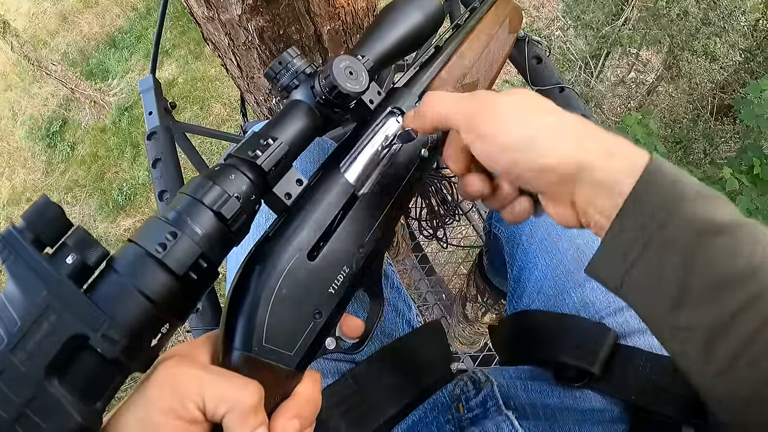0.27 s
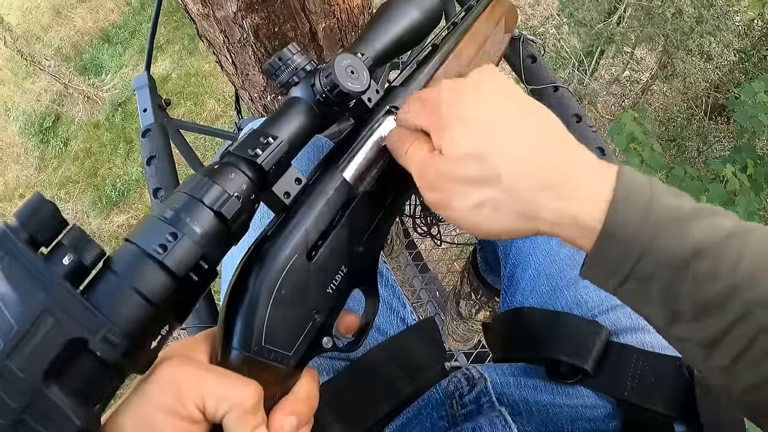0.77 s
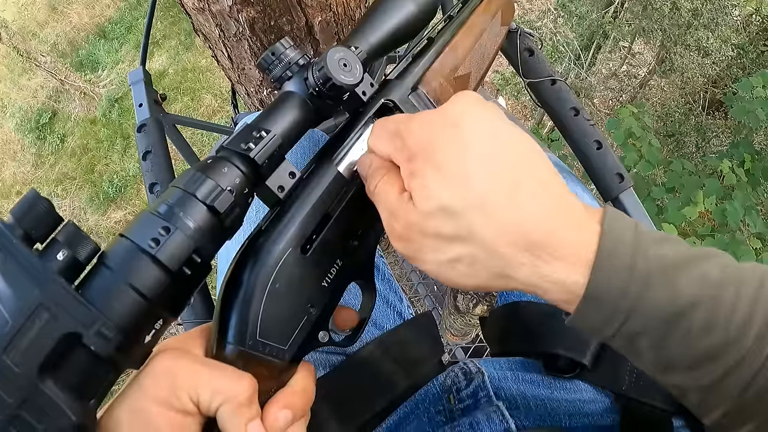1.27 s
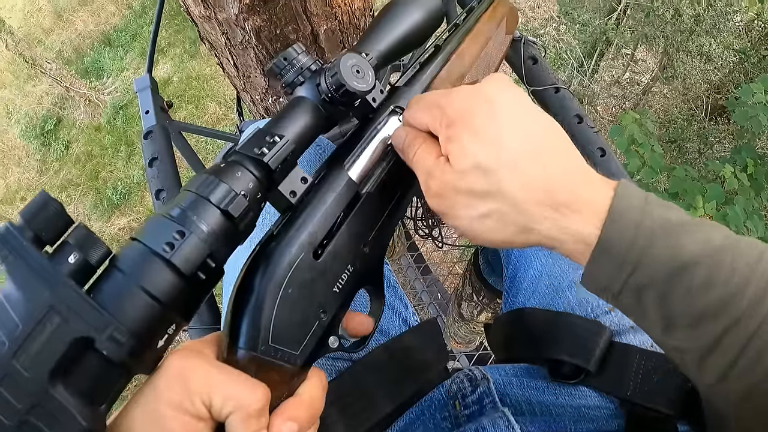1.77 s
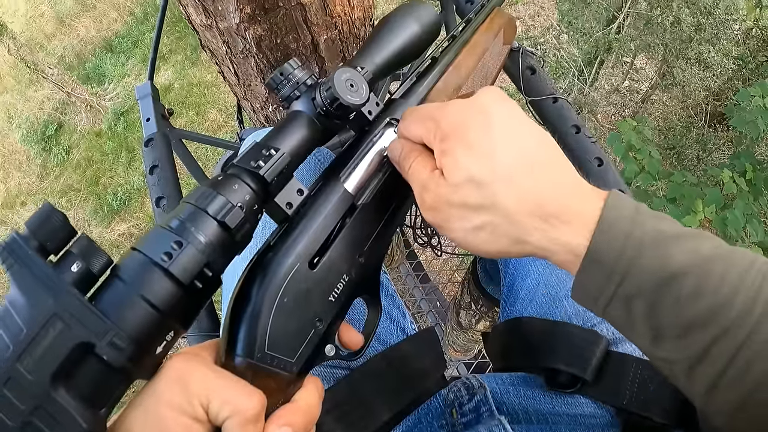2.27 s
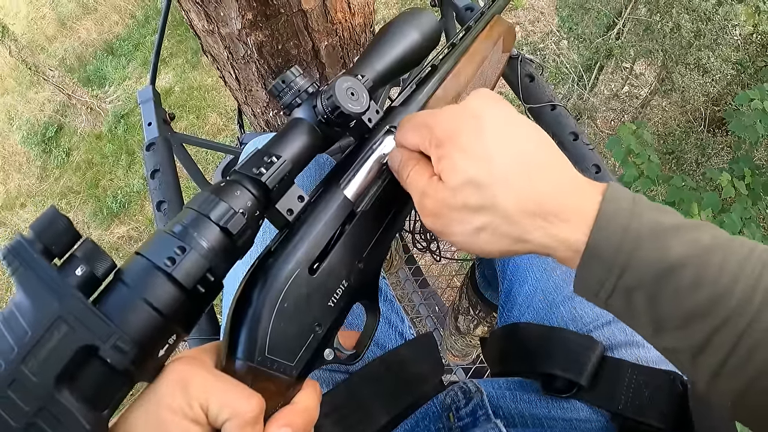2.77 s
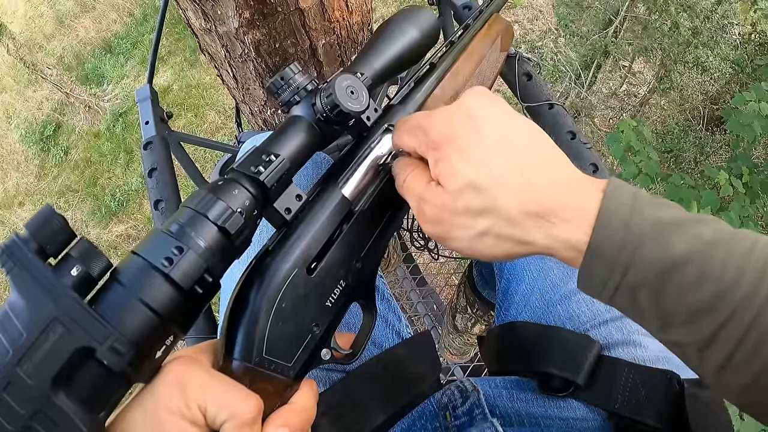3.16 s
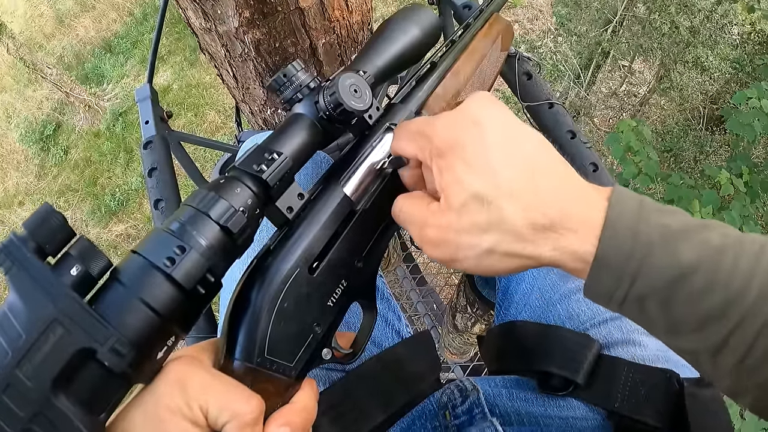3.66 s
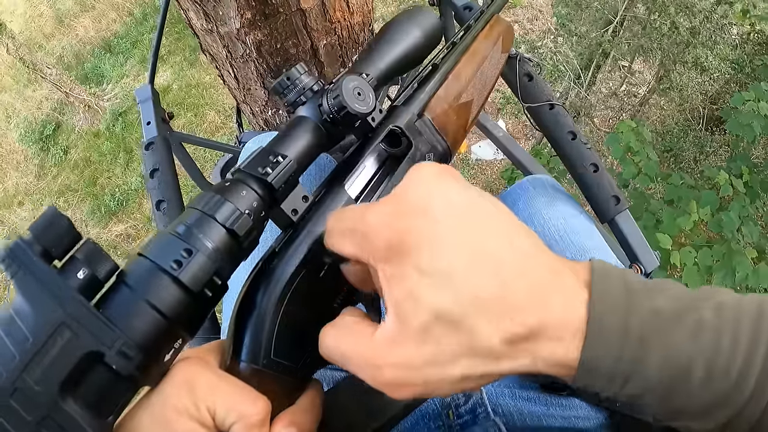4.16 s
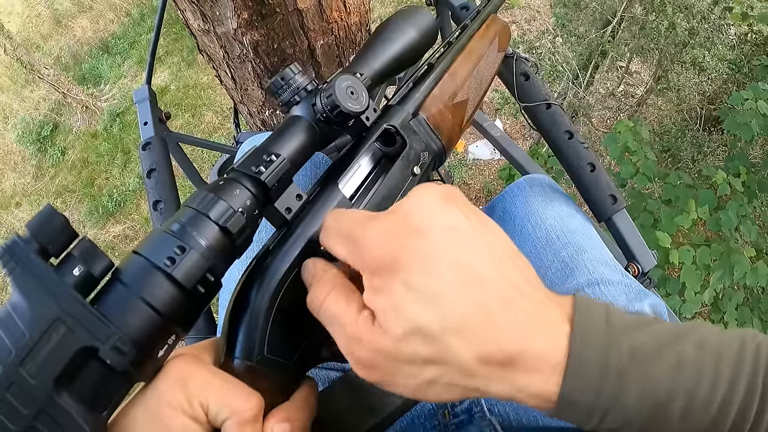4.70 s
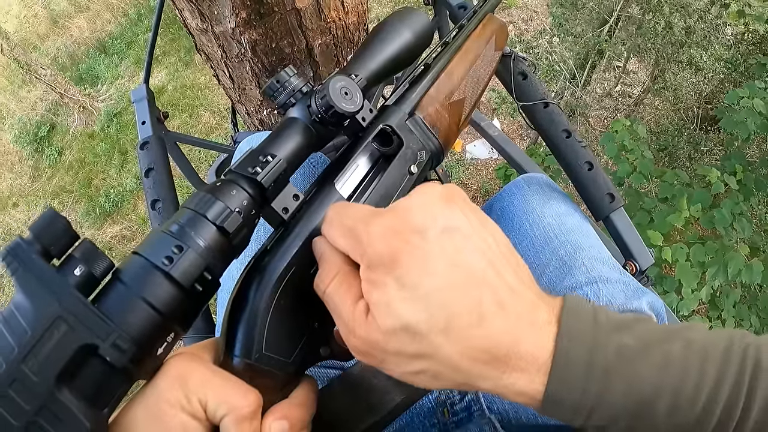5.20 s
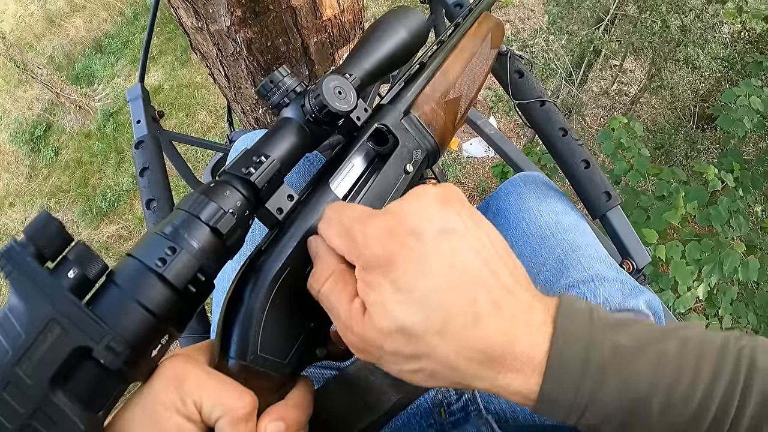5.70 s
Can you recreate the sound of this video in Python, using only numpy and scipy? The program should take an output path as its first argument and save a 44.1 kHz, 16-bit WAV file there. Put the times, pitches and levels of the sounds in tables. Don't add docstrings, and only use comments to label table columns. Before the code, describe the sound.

Outdoors over a low engine hum, hands work a shotgun: bolt drawn back and slammed, shell pushed home, sharp steel clicks.

```python
import sys
import numpy as np
from scipy import signal
from scipy.fft import rfft, irfft, next_fast_len
from scipy.io import wavfile
from scipy.ndimage import uniform_filter1d

SR = 44100
rng = np.random.default_rng(int(sys.argv[2]) if len(sys.argv) > 2 else 0)


def volts(x):
    e = np.asarray(x, float) / 20
    return 10 ** e


def store_pcm(level_fs):
    pcm = np.round(np.clip(level_fs, -1, 1) * 32767).astype(np.int16)
    wavfile.write(sys.argv[1], SR, np.atleast_2d(pcm).T)


N = 261954

# (frequency [Hz], width [Hz], level [dB])
STEEL = [(420, 290, -2), (660, 130, -5), (930, 590, -3), (1028, 200, -3), (1230, 580, -6), (1615, 370, 3.5),
         (1880, 120, -1.5), (2200, 190, 0), (2700, 180, 1.5), (3225, 630, 4.5), (3830, 336, -1),
         (4350, 230, -3), (4850, 140, -4.5), (5570, 710, -1), (6550, 1200, -2.5), (7390, 1200, -4),
         (7960, 580, -8.5), (9600, 500, -8), (9989.5, 640, -21.5), (11970, 820, -12), (13200, 700, -22),
         (14200, 980, -22.5)]


def level(x, db):
    return x * volts(db) / np.sqrt(np.mean(x ** 2))


def add(track, s, sound):
    i = int(s * SR)
    track[..., i:i + sound.shape[-1]] += sound[..., :track.shape[-1] - i]


def colour(x, points):
    hz, db = np.transpose(points)
    size = next_fast_len(len(x))
    f = np.arange(size // 2 + 1) * SR / size + 1
    gain = volts(np.interp(np.log(f), np.log(hz), db, -120, -120))
    return irfft(rfft(x, size) * gain, size)[:len(x)]


def walk(rate_hz):
    k = int(SR / rate_hz)
    held = np.repeat(rng.standard_normal(N // k + 1), k)
    return 1.3 * uniform_filter1d(uniform_filter1d(held, k), k)[:N]


def bed(points, flicker_db, rate_hz):
    return volts(flicker_db * walk(rate_hz)) * level(colour(rng.standard_normal(N), points), 0)


def ring(hz, t60, phase, rise, late=0, bell=1):
    t = np.arange(2600) / SR - .003 - late
    age = np.where(t < 0, -t / rise, t)
    shape = np.exp(-(np.log(1000) / t60 * age) ** bell)
    return shape * np.sin(2 * np.pi * (hz * t + phase))


def engine():
    # (multiple of shaft rate [1], level [dB])
    multiples = [(2, -10.5), (3, -19.5), (4, 2.5), (5, -7.5), (8, -20), (9, -17), (10, -19)]
    # (time [s], level [dB])
    carry = [(0, -35), (.35, -27.5), (.48, -34), (.61, -26.5), (1.14, -33.5), (1.64, -33.5), (2.1, -34.5),
             (2.63, -33), (3.27, -32.5), (3.44, -41), (3.7, -30), (3.8, -36.5), (4.04, -26.5), (4.3, -36.5),
             (4.43, -31), (4.85, -39), (5.19, -35.5), (5.94, -39.5)]
    shaft_hz = 22.78 * (1 + 0.01208 * walk(6))
    turn = 2 * np.pi * np.cumsum(shaft_hz) / SR
    lines = [volts(db + 2.57 * walk(7.2)) * np.sin(k * turn + 2 * np.pi * rng.random())
             for k, db in multiples]
    return level(sum(lines), 0) * volts(np.interp(np.arange(N) / SR, *np.transpose(carry)))


def rumble():
    # (frequency [Hz], density [dB per Hz])
    spectrum = [(15, -11.5), (25, -9.5), (45, 7), (60, -0.5), (75, 2), (110, -10), (140, -35)]
    # (time [s], level [dB], width [s])
    gusts = [
        (0, 8, 0.054),
        (.48, 2, 0.094),
        (1.6, 5, 0.14),
        (2.24, 6.5, 0.09),
        (2.63, -4, 0.17),
        (3.27, 6, .15),
        (4.1, -12, .15),
        (4.35, 5, 0.13),
        (4.81, -16, 0.094),
        (5.2, 0, 0.18),
    ]
    t = np.arange(N) / SR
    gust_db = sum(db * np.exp(-((t - s) / width) ** 2) for s, db, width in gusts)
    return bed(spectrum, 2.7, 6) * volts(-41 + gust_db)


def tyres():
    # (time nearest [s], rms level there [dB], time to double the distance [s])
    passes = [
        (1.4, -47.5, 0.65),
        (5.7, -52.5, 0.76),
    ]
    # (frequency [Hz], density [dB per Hz])
    band = [(600, -23), (700, -1.5), (780, 1.5), (850, -6), (950, -22.5)]
    t = np.arange(N) / SR
    nearness = sum(volts(db) / (1 + ((t - s) / span) ** 2) for s, db, span in passes)
    return bed(band, 0.56, 4.6) * nearness


def woods():
    # (frequency [Hz], density [dB per Hz])
    wash = [(65, -32.5), (110, 3.5), (119, -1), (253, -7.5), (317, -7), (491, -14), (575, -13.5),
            (657, -13.5), (811, -17), (990, -20), (1470, -24), (1640, -26), (2600, -47.5), (3380, -70.5),
            (5720, -120)]
    # (frequency [Hz], density [dB per Hz])
    leaves = [(1200, -13.5), (2000, 6), (3000, 3), (5000, -1.5), (8000, -8.5), (10300, -6.5), (11000, -21),
              (15000, -25.5), (16000, -59.5)]
    # (frequency [Hz], density [dB per Hz])
    insects = [(8000, -20.5), (8800, 3.5), (9300, 4.5), (9700, 3), (10200, -19), (10800, -24.5)]
    hiss = bed(insects, 1.5, 44) * volts(-67.5 + 1.5 * walk(4))
    return bed(wash, 1.25, 6.065) * volts(-38) + bed(leaves, 0.63, 6.9) * volts(-60.5) + hiss


def surroundings():
    # (time [s], level [dB])
    gain = [
        (0, 0.5),
        (.6, -0.5),
        (1.6, -2),
        (2.15, -1.5),
        (2.3, -7),
        (2.7, -8.5),
        (3.3, -4),
        (4.4, -4.5),
        (4.9, -2.5),
        (5.94, -3.5),
    ]
    t = np.arange(N) / SR
    near, apart = woods(), woods()
    mid = engine() + rumble() + tyres() + near
    width_db = -9 - 46 * np.maximum(t - 0.65, 0)
    side = colour(apart, [(60, -28), (400, -12.5), (1500, 5), (16000, 3.0)]) * volts(width_db)
    trace = colour(apart, [(1000, -32), (3000, 1), (10500, -2), (11500, 18), (16000, 19)])
    side = side + trace * volts(-24 + 4.0 * walk(6))
    return volts(np.interp(t, *np.transpose(gain))) * np.array([mid + side, mid - side])


def taps():
    # (time [s], peak level [dB], tick relative level [dB])
    touches = [
        (.0079, -17.5, -15),
        (0.167, -18.5, -11),
        (0.1726, -17.5, -5.5),
        (0.4414, -6, -14.5),
        (0.4838, -6.5, -24),
        (0.4916, -7.5, -11.5),
    ]
    tick_hz, tick_s = 3400, .00007
    out = np.zeros((2, N))
    t = np.arange(1, 1600) / SR
    turns = np.log(1 + t / .0003) / 1.7
    swing = np.cos(2 * np.pi * turns) * np.exp(-t / .011) * np.minimum(t / .0008 + .3, 1)
    swing = swing - .2 * np.exp(-t / .005) * np.minimum(t / .0003, 1)
    swing = signal.lfilter(*signal.butter(2, 8500, fs=SR), swing)
    slow = swing * np.minimum(t / .003, 1) ** 1.5
    tick = -np.exp(-np.abs(t - .0004) / tick_s) * np.cos(2 * np.pi * tick_hz * (t - .0004))
    for s, db, tick_db in touches:
        add(out, s, volts(db) * (np.array([.5 * slow, swing]) + volts(tick_db) * tick))
    return signal.sosfilt(signal.butter(4, 12500, fs=SR, output="sos"), out)


def barrel():
    # (time [s], peak level [dB], frequency [Hz], t60 [s])
    hums = [
        (1.86, -53, 2640, 0.53),
        (1.88, -56, 7820, 0.21),
        (3.6193, -33.5, 1090, 0.079),
        (3.62, -52, 3350, .09),
        (3.622, -53, 3520, .09),
        (4.185, -57, 7500, 0.15),
        (4.186, -46, 4080, 0.16),
        (4.301, -51, 8200, 0.34),
    ]
    out, t = np.zeros(N), np.arange(SR // 2) / SR
    for s, db, hz, t60 in hums:
        add(out, s, volts(db - 60 * t / t60) * np.sin(2 * np.pi * hz * t))
    return out


def strokes(fall_db_s, treble):
    # (time at full rub [s], rms level [dB], lead-in [s], hold [s], treble relative level [dB])
    rubs = [(0.715, -54, .025, 0.01, -14), (0.926, -40.5, 0.019, 0.042, -30.5),
            (1.817, -28.5, 0.03, 0.022, -16), (1.853, -39, 0.019, 0.014, -13),
            (2.193, -22, 0.037, 0.013, -2.5), (2.236, -26.5, 0.019, 0.0089, -8.5),
            (2.254, -39.5, .02, 0.0096, -11), (2.276, -57.5, .02, 0.0067, -14),
            (3.149, -43, 0.0092, .001, -1.5), (3.655, -51.5, 0.02, 0.0083, -14), (3.619, -58, .01, .02, -8),
            (4.105, -49.5, .02, 0.024, -15), (4.149, -31, 0.019, 0.035, -7),
            (4.301, -29, 0.043, 0.006, -3.5), (4.316, -38.5, 0.025, 0.016, -12),
            (4.72, -62, .03, 0.025, -12), (4.905, -50, .03, .002, -11), (5.864, -34.5, 0.017, .002, 0),
            (5.898, -47, .01, .012, -8), (5.907, -36, 0.015, 0.026, 1.5)]
    out, settle = np.zeros(N), np.zeros(N)
    t = np.arange(-SR // 8, SR // 2) / SR
    for s, db, lead_s, hold_s, treble_db in rubs:
        after = np.maximum(t - hold_s, 0)
        size = volts(db - 1.5 + treble * treble_db)
        add(out, s + t[0], size * np.where(t < 0, volts(38 * t / lead_s), volts(-fall_db_s * after)))
        add(settle, s + t[0], size * (t > 0) * volts(-25.5 - 8.0 * treble - 108 * after))
    return out * volts(2 * walk(60)) + settle


def slides():
    slips = rng.standard_normal(N) * volts(2.0 * rng.exponential(size=N) + 2.5 * walk(400))
    low, high = np.zeros(N), np.zeros(N)
    for hz, width_hz, db in STEEL:
        mode = signal.lfilter(*signal.iirpeak(hz, hz / width_hz, SR), slips)
        gain = volts(db) * np.sqrt(1000 / width_hz) * volts(-8 * (hz > 11000))
        add(low if hz < 5000 else high, 0, gain * mode)
    low = level(colour(low, [(20, 0), (9000, 0), (11500, -7), (20000, -16)]), 0)
    high = level(colour(high, [(2000, 0), (9500, 0), (11000, -18), (20000, -28)]), 0)
    return strokes(748, treble=0) * low + strokes(948.5, treble=0.95) * high


def pings():
    # (time [s], peak level [dB], frequency [Hz])
    tones = [(.72, -40, 5700), (0.727, -42, 3300), (0.9384, -31, 3060), (0.965, -33, 4000),
             (.9666, -31, 2800), (1.8172, -18, 1790), (1.8223, -26, 5900), (1.8239, -25, 7800),
             (1.8263, -17.5, 4570), (1.8254, -25, 5930), (1.8293, -23, 3800), (1.831, -23, 6000),
             (1.8316, -21, 4720), (1.8321, -26, 1900), (1.8373, -27, 3200), (1.856, -24, 1606),
             (2.1893, -21, 1695), (2.1928, -23, 1710), (2.196, -19, 1400), (2.198, -13.5, 2200),
             (2.1993, -20, 7700), (2.201, -15, 1797), (2.201, -20, 7400), (2.202, -20, 4000),
             (2.204, -18, 9100), (2.207, -22, 8700), (2.211, -19, 1400), (2.2428, -18.5, 2990),
             (2.2479, -18, 3310), (3.1508, -35, 4600), (3.1518, -36, 8400), (3.1518, -38, 9400),
             (5.9076, -31, 5600), (3.623, -45, 2100), (3.653, -51, 6700), (4.1478, -21, 1900),
             (4.1525, -26, 2920), (4.1533, -26, 1198), (4.155, -28, 8400), (4.1578, -26, 2390),
             (4.164, -25, 7800), (4.1657, -21, 8740), (4.1655, -23, 2500), (4.1664, -28, 6200),
             (4.179, -20, 4400), (4.1787, -21, 3720), (4.1843, -18.5, 1700), (4.1845, -23, 8100),
             (4.1905, -27, 4000), (4.301, -22.5, 7600), (4.3012, -24, 4530), (4.307, -24, 3510),
             (4.3129, -28, 4550), (4.3197, -25, 4500), (4.3196, -29, 3220), (4.329, -32, 1600),
             (5.8654, -21, 2700), (5.8742, -29, 1800), (5.9275, -24, 1990), (5.937, -23, 3280)]
    out = np.zeros(N)
    for s, db, hz in tones:
        add(out, s - .003, volts(db) * ring(hz, .011, hz * s, .7, bell=1.5))
    return out


def knocks():
    # (time [s], peak level [dB], frequency [Hz])
    parts = [(.396, -33, 1150), (.721, -36, 2518), (.721, -41, 1900), (.9329, -10, 5700),
             (.9331, -16, 4400), (.933, -28, 1530), (1.045, -31, 780), (1.805, -34, 720), (1.82, -21, 680),
             (1.821, -19, 1300), (1.858, -24, 790), (2.0785, -33, 900), (1.823, -24, 960),
             (2.2065, -15, 1230), (2.2072, -14, 1060), (2.208, -18, 888), (2.245, -20, 920),
             (3.151, -31.5, 1080), (3.152, -28, 1900), (3.151, -30, 2500), (3.652, -38, 4500),
             (4.165, -28, 900), (4.302, -29, 850), (5.867, -27, 2720)]
    # (time [s], peak level [dB], frequency [Hz])
    stock = [(1.82, -17.5, 388), (1.828, -22, 400), (2.204, -8.5, 83.3), (2.244, -17.5, 121),
             (2.245, -15.5, 420), (2.262, -21, 340), (2.269, -20, 151), (4.186, -27, 332),
             (4.301, -27.5, 380), (4.31, -23, 55), (5.918, -25.5, 410)]
    # (time [s], peak level [dB])
    tube = [
        (1.829, -19),
        (2.216, -22),
        (3.62, -34.5),
        (4.185, -50),
        (5.908, -28),
    ]
    # (time [s], peak level [dB])
    spring = [(1.824, -33), (2.187, -42), (2.197, -35), (2.2015, -24), (2.208, -35), (2.239, -36),
              (2.249, -40), (3.152, -48), (4.143, -45), (4.1533, -31), (4.165, -33), (4.184, -38),
              (4.3012, -29), (4.32, -44), (4.903, -54), (5.864, -35), (5.917, -39)]
    # (frequency [Hz], level [dB])
    spring_modes = [(11900, -1.5), (12600, 0.5), (13400, -4.5), (14500, -11)]
    rows = [(s, db, hz, 29.6 / hz) for s, db, hz in parts]
    rows += [(s, db, hz, .033) for s, db, hz in stock]
    rows += [(s, db, 648, .061) for s, db in tube]
    rows += [(s, db + mode_db, hz, .013) for s, db in spring for hz, mode_db in spring_modes]
    out = np.zeros(N)
    for s, db, hz, t60 in rows:
        phase = .25 + (hz > 11000) * hz * s
        add(out, s - .003, -volts(db) * ring(hz, t60, phase, .15))
    return out


def clicks():
    # (time [s], ring level [dB], ring frequency [Hz],
    # modes near 1.5 kHz relative level [dB], modes near 8 kHz relative level [dB])
    ticks = [(0.288, -47.5, 2830, -8, -4), (0.704, -43, 1120, 1.5, -30), (0.7219, -19.5, 3200, -22.5, -26),
             (.9338, -16, 3220, -23, -14.5), (.953, -46, 3050, -3, -19), (0.9602, -27.5, 2920, -12, -10),
             (0.9663, -31.5, 2140, -10.5, -16), (1.0438, -38.5, 2940, -9, -17),
             (1.051, -44.5, 2080, -4, -9), (1.351, -47, 2700, -15, -25), (2.5093, -38, 3280, -10.5, -17),
             (3.1515, -26.5, 3250, -10, -12), (3.154, -33.5, 1880, -11, -10), (3.3164, -50, 1840, -11, -27),
             (3.569, -30, 1880, -7, -46), (3.5687, -38.5, 2770, -15, -30), (3.621, -39, 1000, -10, -19),
             (3.652, -38, 2800, -7, -17), (3.6556, -44, 2960, -5, -12), (4.7457, -47, 1780, -5.5, -22),
             (4.903, -37.5, 1930, -10.5, -8), (4.908, -44, 1100, 6, -25)]
    bolt_back = [
        (1.8124, -28, 2100, -8, -22),
        (1.8205, -14.5, 3100, -11.5, -18),
        (1.8239, -22.5, 3200, -10, -9),
        (1.8271, -17.5, 2800, -12, -6),
        (1.8321, -18.5, 3000, -8, -12),
        (1.8447, -32, 2960, -4, -19),
        (1.8575, -23, 3300, -10.5, -4),
        (1.8603, -28, 1620, -9.5, -9),
        (1.8668, -33.5, 3300, -1, -21),
    ]
    bolt_slam = [(2.196, -22.5, 6700, -9, -14), (2.202, -15, 2730, -9.5, -10.5),
                 (2.2082, -20.5, 3400, -8.5, -6), (2.2172, -28.5, 2804, -9, -12),
                 (2.2337, -33.5, 1880, -10, -12), (2.2392, -19.5, 1940, -5, -9),
                 (2.2429, -13, 1920, -16.5, -10), (2.2484, -18, 1880, -8.5, -13),
                 (2.252, -28.5, 2020, -4, -11), (2.261, -35, 1910, 1.5, -4),
                 (2.2688, -31.5, 1960, -3, -10.5)]
    shell_in = [(4.102, -50, 4300, 3, -14), (4.1116, -43, 2490, -8, -11), (4.1253, -43, 4700, -1, -20),
                (4.1321, -27, 1880, -15, -28), (4.1426, -29, 1900, -8, -20),
                (4.1478, -17, 2980, -19.5, -25), (4.1536, -23.5, 4670, -10.5, -28),
                (4.158, -23, 4820, -15, -15), (4.1643, -18, 4250, -20, -4), (4.1788, -18, 1880, -12.5, -13),
                (4.1842, -12.5, 4040, -18, -13)]
    carrier = [
        (4.3014, -8.5, 1850, -22.5, -13),
        (4.3045, -20.5, 3830, -11, -13),
        (4.313, -31, 3130, -5, -8),
        (4.3207, -21, 1880, -12, -17),
        (4.33, -31.5, 3080, -4, -4),
    ]
    latch = [
        (5.865, -21.5, 1710, -19, -10),
        (5.8688, -17, 1700, -28, -19),
        (5.8925, -34, 2110, -10, -14),
        (5.909, -25, 2880, -14, -5),
        (5.9175, -7.5, 3040, -36, -21),
        (5.928, -21, 2880, -18, -17),
        (5.9333, -22, 3130, -20, -12),
        (5.937, -21.5, 2080, -16, -11),
    ]
    # (contacts, t60 [s])
    actions = [(ticks, .01), (bolt_back, .014), (bolt_slam, .017),
               (shell_in, .011), (carrier, .0099), (latch, .011)]
    out = np.zeros(N)
    hz, width_hz, steel_db = np.transpose(STEEL)
    rows = [(*row, t60) for hits, t60 in actions for row in hits]
    chance = rng.standard_normal((len(rows), 5, len(STEEL)))
    for row, (phase, off, mix, damp, late) in zip(rows, chance):
        s, db, ring_hz, low_db, high_db, t60 = row
        tilt_db = np.interp(np.log(hz), np.log([1500, 8000]), [low_db, high_db])
        gains = volts(steel_db + tilt_db + mix + 2.0)
        lives = t60 * (3000 / hz) ** .35 * volts(2 * damp - 3)
        lags = .0004 * np.abs(late)
        pitches = hz + .5 * width_hz * off
        body = sum(g * ring(f, life, p, .312, lag)
                   for g, f, life, p, lag in zip(gains, pitches, lives, phase, lags))
        crack = sum(g * ring(f, .004, p, .3) for g, f, p in zip(gains, pitches, mix))
        part = ring(ring_hz, t60, phase[0], .57, bell=1.54)
        add(out, s - .003, volts(db) * (1.2 * part + body + volts(1.5) * crack))
    return out


def ports(x):
    # (frequency [Hz], level relative to the common sound [dB])
    scatter = [(100, -64), (1000, -31), (3500, -22), (6500, -14), (9500, -14), (11200, -8), (13000, -0.5),
               (16000, -2)]
    # (frequency [Hz], level relative to the common sound [dB])
    right_only = [(10800, -41.5), (11500, -6.5), (12300, 1.5), (16000, 4.5)]
    side = walk(500) * colour(x, scatter) - colour(x, right_only)
    return np.array([x + side, x - side])


def scene():
    gun = ports(clicks() + knocks() + pings() + barrel() + slides())
    return surroundings() + taps() + gun


def roll_off(x):
    return signal.sosfilt(signal.butter(12, 15720, fs=SR, output="sos"), x)


def record(dry):
    ceiling = 1.1
    held = ceiling * np.tanh(dry / ceiling)
    t = np.arange(-1500, 1501) / SR
    halo = rng.standard_normal(len(t)) * np.exp(-((t + .0043) / .013) ** 2)
    halo = halo * volts(-11.5) / np.sqrt(np.sum(halo ** 2))
    bright = signal.sosfilt(signal.butter(3, [1200, 9800], "band", fs=SR, output="sos"), held)
    wet = held + signal.fftconvolve(bright, halo[None], "same", axes=1)
    wet = signal.sosfilt(signal.ellip(8, .5, 60, 15250, fs=SR, output="sos"), wet)
    return roll_off(wet)


dry = scene()
out = record(dry)
store_pcm(out)
```